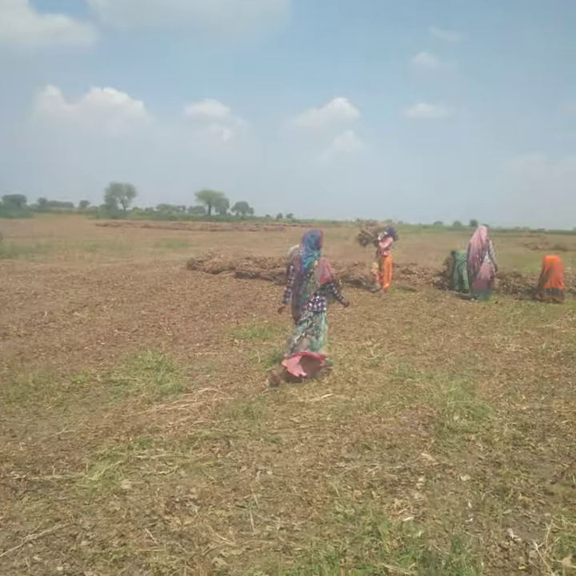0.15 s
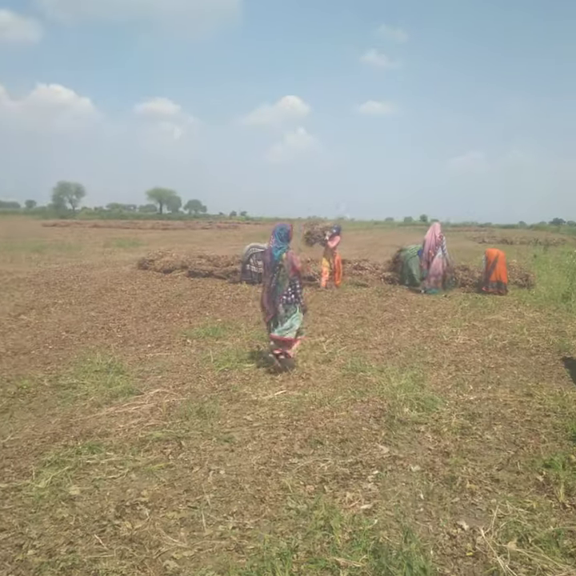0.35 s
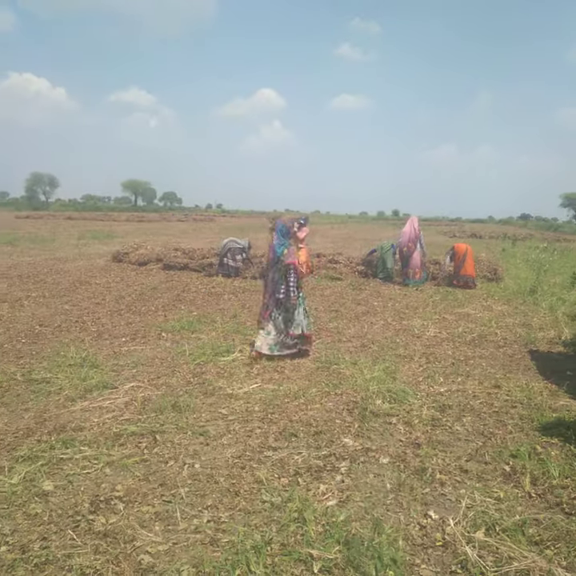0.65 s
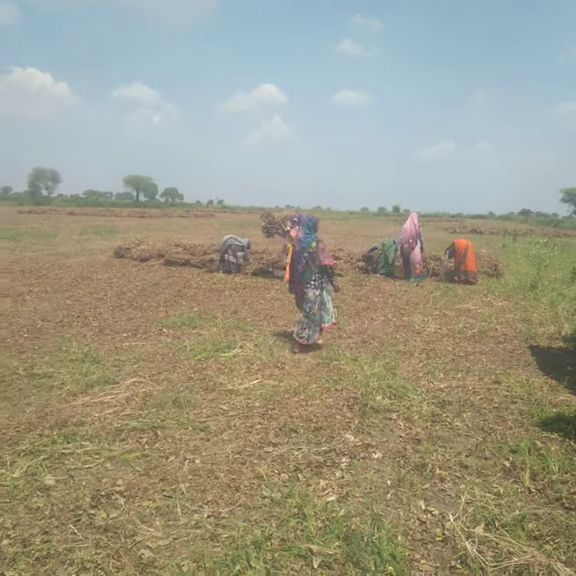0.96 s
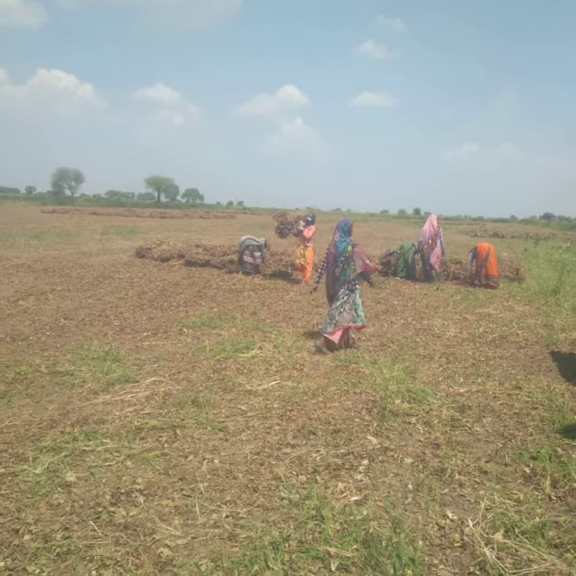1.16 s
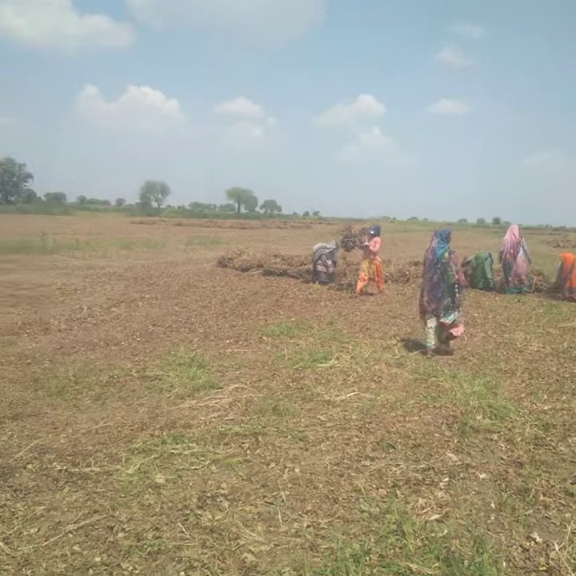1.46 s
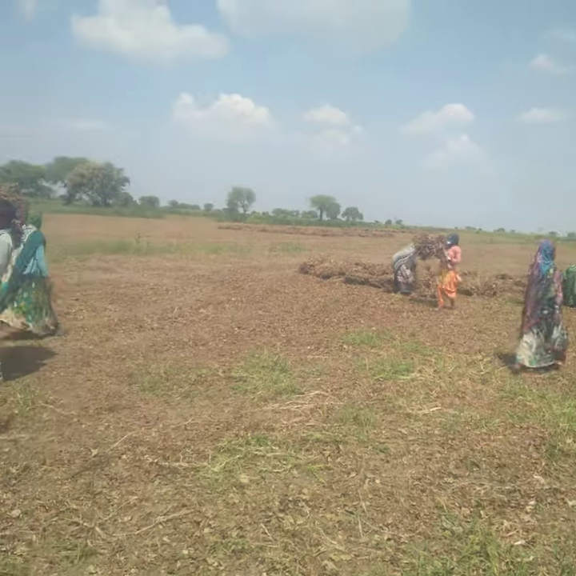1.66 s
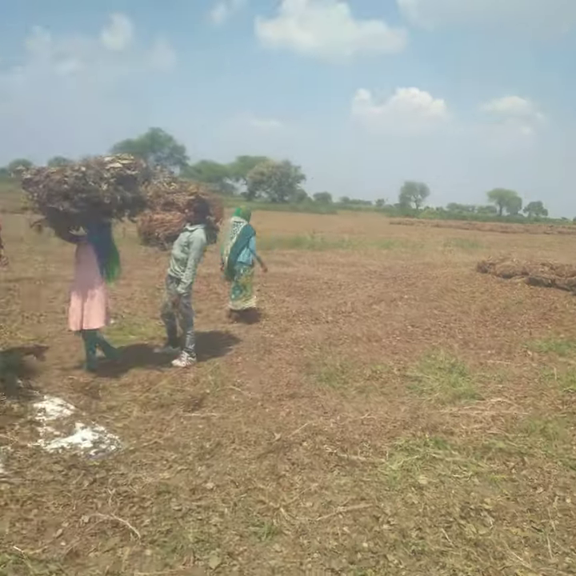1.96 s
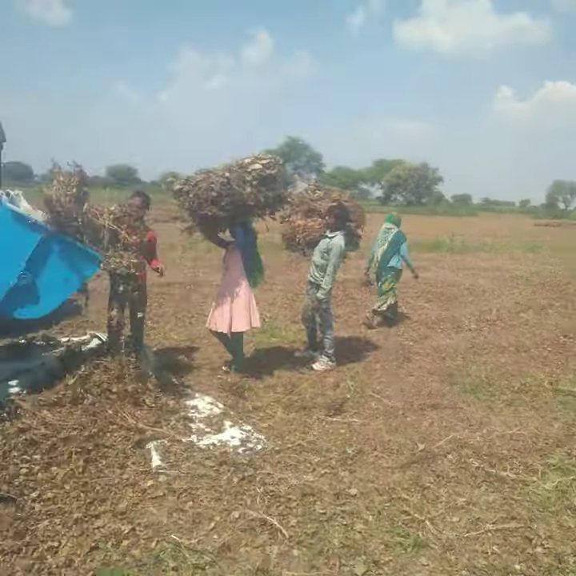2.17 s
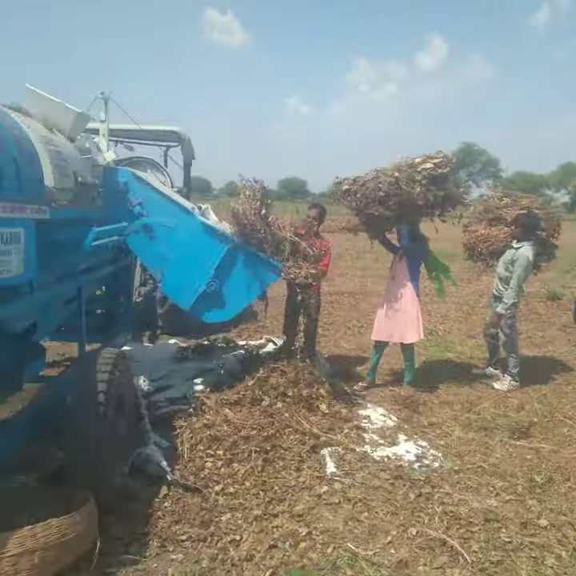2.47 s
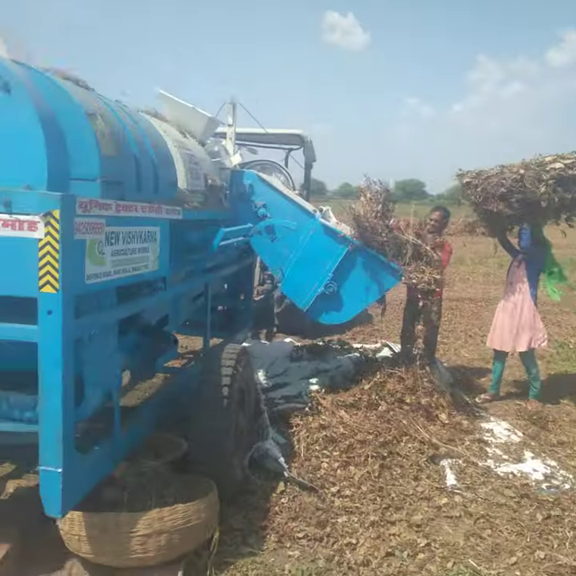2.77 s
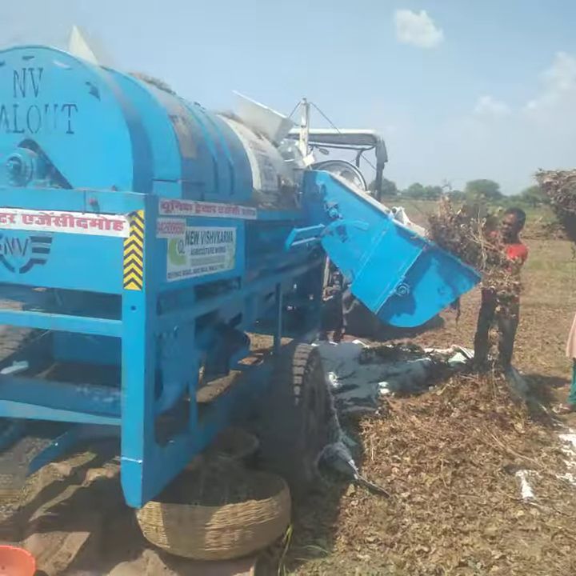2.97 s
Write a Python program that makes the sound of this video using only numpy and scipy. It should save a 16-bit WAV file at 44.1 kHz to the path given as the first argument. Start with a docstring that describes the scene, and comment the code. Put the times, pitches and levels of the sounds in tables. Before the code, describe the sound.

Close to the microphone outdoors, a thresher and its engine make a steady, throbbing roar with a rhythmic hiss of shaken chaff. Faint metal squeaks come now and then, and the tone shifts slightly near the end.

```python
"""Open field, a phone's stereo microphones close to a threshing machine driven by a tractor engine.
From the start, side-on: blower blades throb over the engine's drone, air and chaff rush through the
sheet-metal housing and the sieve shakes out a puff of hiss at each stroke. Rubbing metal squeaks now
and then, most often around 2 s. From 2.1 s the phone turns to face the machine and the tone shifts."""
import sys
import numpy as np
from scipy import signal
from scipy.io import wavfile
from scipy.ndimage import uniform_filter1d

SR = 44100
rng = np.random.default_rng(int(sys.argv[2]) if len(sys.argv) > 2 else 0)


def to_wav(sig):
    """Store sig (one row per channel, or 1-D mono) as 16-bit WAV at the path in sys.argv[1].

    Samples outside -1..1 are clipped; the rate is SR.
    """
    pcm = np.clip(np.atleast_2d(sig), -1, 1) * 32767
    pcm = np.round(pcm).astype(np.int16)
    wavfile.write(sys.argv[1], SR, pcm.T)  # frames by channels


N = 137151

# blower speed: (time [s], blade passes [1/s])
BLADE_RATE = [(0, 44.1), (.5, 44.0), (1.1, 43.93), (1.4, 44.05), (2.0, 44.1), (2.3, 44.25), (3.11, 44.42)]
# tones at the left microphone: (multiple of the rate, side-on rms level [dB], change when facing [dB])
BLADE_TONES = [(1, -16, 0.1), (2, -15.5, 1.5), (3, -32, 3.5), (4, -29.5, 2.5), (5, -33.5, 4.5), (6, -33, 2),
               (7, -32.5, -0.5), (8, -44, -2), (9, -41.5, 0), (10, -37, -5), (11, -48.5, 3),
               (12, -45.5, -10), (13, -57, 15)]  # on the blade rate
ENGINE_TONES = [(1, -37.5, 1), (2, -28, -2), (3, -35, 0), (4, -33.5, 0), (5, -39, 0), (6, -43, 0)]  # on the crank rate
SHAFT_AND_HALF_ORDER = [(.787, -36, -4), (1.5, -39, 0)]  # on the blade rate
# colour of the rush at each microphone, before RUSH_TRIM_DB: (frequency [Hz], density [dB/Hz])
RUSH_LEFT_SIDE_ON = [(20, -58), (32, -45), (62, -46), (100, -40.5), (121, -51), (150, -49.5), (220, -48.5),
                     (290, -53), (360, -53), (500, -57.5), (700, -61), (1000, -56.5), (1400, -62),
                     (1900, -57.5), (2400, -63), (2850, -70), (3350, -60), (3900, -57), (4400, -57.5),
                     (4800, -60.5), (5400, -62.5), (6300, -67.5), (7200, -62), (7800, -69.5), (8600, -71.5),
                     (9300, -78), (10500, -87), (12500, -85), (15500, -95)]
RUSH_LEFT_FACING = [(500, -68.5), (700, -56), (1000, -59), (1400, -62.5), (1900, -59), (2400, -59.6),
                    (2850, -61.5), (3350, -68), (3900, -63.5), (4400, -61), (4800, -61.5), (5400, -63),
                    (6300, -63.5), (7200, -65), (7800, -74), (8600, -71), (9300, -82), (10500, -83),
                    (12500, -89), (15500, -93)]
RUSH_RIGHT = [(500, -59.5), (700, -61), (1000, -61), (1400, -66), (1900, -63), (2850, -66.5), (3900, -65),
              (6300, -69), (7200, -73), (7800, -65.5), (8600, -67.5), (9300, -70), (10500, -79),
              (12500, -89), (15500, -91)]
# how alike the rush is at the two microphones: (frequency [Hz], coherence [0-1])
COHERENCE = [(60, .998), (130, .985), (300, .975), (600, .91), (900, .83), (1200, .7), (1500, .42),
             (2300, .15), (4000, .05), (15000, 0)]
# the phone's turn from side-on to facing the machine: (time [s], turn [0-1])
PHONE_TURN = [(0, 0), (2.1, 0), (2.45, 0.6), (2.6, 0.78), (3.11, 0.98)]
# swells of the rush about MID_REST_DB and TREBLE_REST_DB: (time [s], mids [dB], treble [dB])
RUSH_SWELLS = [(0.0, -31, -34), (0.02, -28.5, -32.5), (0.42, -28, -34), (0.52, -28.5, -33),
               (1.14, -28, -33.5), (1.21, -29, -30.5), (1.28, -28, -34), (1.93, -27.5, -32),
               (2.18, -27.5, -32), (2.91, -28, -31.5), (3.05, -27, -31.5), (3.11, -27.5, -34.5)]
# sieve strokes: (time [s], treble rise [dB])
SIEVE_STROKES = [(.08, 0), (.31, 4), (.54, 2), (.76, 1.5), (.98, 2), (1.21, 0.5), (1.44, 3), (1.66, 2),
                 (1.89, 2.5), (2.12, 0), (2.35, 3), (2.58, 3), (2.8, 3), (3.03, 3.5)]
# squeaks at the left microphone: (time [s], level [dB], pitch [Hz], length [s])
METAL_SQUEAKS = [(.31, -33, 3950, .04), (.75, -34, 4050, .03), (1.425, -32, 4050, .03),
                 (1.835, -33, 4300, .03), (1.92, -33, 3870, .08), (1.975, -30, 3880, .03),
                 (2.0, -29, 4000, .035), (2.02, -33, 4400, .035), (2.04, -34, 4000, .05),
                 (2.45, -29.5, 3950, .04)]

BLADE_WAVER_DB, ENGINE_WAVER_DB, WAVER_RAD = .2, .4, .045  # per multiple
CRANK_PER_PASS = .6239  # crank turns per blade pass
HUM_RIGHT_DB, HUM_LAG_RAD = -1, .13
RUSH_TRIM_DB, MID_REST_DB, TREBLE_REST_DB = -.5, -29, -33
PATCH_DB, FLICKER_DB = .7, .8
LAG_SIDE_ON_S, LAG_FACING_S, LAG_UP_TO_HZ = 170e-6, 90e-6, 1700  # the rush reaches the right mic later
SHARED_BELOW_HZ = 350  # the bass has one colour at both microphones
CHAFF_PER_S, CHAFF_SHARE, CHAFF_SPREAD_DB = 2500, .13, 3.5
PINGS_PER_S, PING_T60_S, PING_SHARE = 900, .06, .08
STROKE_S, PUFF_S, BACKSTROKE_SHARE, PUFF_FROM_HZ = .227, .014, .5, 3000
SQUEAK_WIDTH_HZ, SQUEAK_RIGHT_DB, SQUEAK_FUZZ = 40, -8, .35


def blower(passes):
    """Each passing blade pushes out a pulse; harmonics above the fifth fall out of step with it."""
    lead_rad = lambda k: 1.25 * (k == 1) + 2 * np.pi * rng.random() * (k > 5)
    return tones(passes - .06, BLADE_TONES, lead_rad, BLADE_WAVER_DB)


def engine(passes):
    """Firings of the engine belted to the blower, suction first."""
    return tones(CRANK_PER_PASS * passes + .195, ENGINE_TONES, lambda k: np.pi, ENGINE_WAVER_DB)


def shaft_and_half_order(passes):
    """One shaft's low hum and the blower's half-order tone."""
    return tones(passes, SHAFT_AND_HALF_ORDER, lambda k: 0, ENGINE_WAVER_DB)


def rush():
    """Air and chaff hiss through the housing, swelling, flickering and puffing with the sieve."""
    ticks = np.sqrt(CHAFF_SHARE) * chaff()
    air = np.sqrt(1 - CHAFF_SHARE) * rng.standard_normal((2, N))
    steady = rush_at_microphones(air + ticks + np.sqrt(PING_SHARE) * housing_pings())
    hz, t, spectrum = signal.stft(steady, SR, nperseg=512, noverlap=384)
    patches = rng.standard_normal((len(t), len(hz))).T
    patches = uniform_filter1d(patches, size=8, axis=0)
    patches = unit_spread(uniform_filter1d(patches, size=20, axis=1))
    flicker = unit_spread(uniform_filter1d(rng.standard_normal(len(t)), size=12))
    hz = hz[:, None]
    above_bass = np.clip(hz / 600, 0, 1)
    treble = np.clip((hz - 2500) / 3500, 0, 1)
    puff_band = hz ** 2 / (hz ** 2 + PUFF_FROM_HZ ** 2)
    gain_db = above_bass * (1 - treble) * (curve(RUSH_SWELLS, t) - MID_REST_DB)
    gain_db += treble * (curve(RUSH_SWELLS, t, column=2) - TREBLE_REST_DB)
    gain_db += above_bass * PATCH_DB * patches
    gain_db += puff_band * (sieve_db(t) + FLICKER_DB * flicker)
    return signal.istft(spectrum * amp(gain_db), SR, nperseg=512, noverlap=384)[1][:, :N]


def chaff():
    """Flying chaff makes dense ticks of uneven strength."""
    ticks = (rng.random((2, N)) < CHAFF_PER_S / SR) * rng.choice([-1., 1.], (2, N))
    strength_db = CHAFF_SPREAD_DB * np.minimum(rng.exponential(1, (2, N)), 5)
    return unit_spread(ticks * amp(strength_db))


def housing_pings(count=60, low_hz=700, high_hz=13000):
    """Stalks strike the housing, each briefly ringing one patch of sheet metal."""
    t, out = np.arange(4096) / SR, np.zeros((2, N))
    for hz in np.linspace(low_hz, high_hz, count) * rng.uniform(.97, 1.03, count):
        blows = (rng.random((2, N)) < PINGS_PER_S / count / SR) * rng.random((2, N))
        ring = amp(-60 * t / PING_T60_S) * np.sin(2 * np.pi * hz * t) * np.minimum(t / .002, 1)
        for side, at in zip(*np.nonzero(blows)):
            part = out[side, at:at + len(t)]
            part += blows[side, at] * ring[:len(part)]
    return unit_spread(out)


def sieve_db(t):
    """The hiss rises at each sieve stroke, and less on the way back."""
    puff = lambda at: np.exp(-.5 * ((t - at) / PUFF_S) ** 2)
    return sum(db * (puff(at) + BACKSTROKE_SHARE * puff(at + STROKE_S / 2)) for at, db in SIEVE_STROKES)


def squeaks():
    """Rubbing metal gives short fuzzy whistles, mostly on the left."""
    t, out = np.arange(4410) / SR, np.zeros(N)
    pole = np.exp(-np.pi * SQUEAK_WIDTH_HZ / SR)
    for start, db, hz, length in METAL_SQUEAKS:
        noise = rng.standard_normal(len(t))
        fuzz = SQUEAK_FUZZ * unit_spread(signal.lfilter([1 - pole], [1, -pole], noise))
        arch = np.sin(np.pi * np.clip(t / length, 0, 1))
        whistle = np.sqrt(2) * (1 + fuzz) * np.sin(2 * np.pi * hz * t + fuzz)
        out[round(start * SR):][:len(t)] += amp(db) * arch * whistle
    return out * amp([[0], [SQUEAK_RIGHT_DB]])


def tones(cycles, table, lead_rad, waver_db):
    """Wavering multiples of one rotation, a little later and softer at the right microphone."""
    t, left = np.arange(N) / SR, np.zeros(N, complex)
    coarse_t = t[::200]
    turn = curve(PHONE_TURN, coarse_t)
    for k, db, facing_db in table:
        level = amp(db + facing_db * turn + waver_db * k * drift(coarse_t, top_hz=12))
        wobble = np.exp(1j * WAVER_RAD * k * drift(coarse_t, top_hz=7.3))
        phase = 2 * np.pi * k * cycles + lead_rad(k)
        left += np.interp(t, coarse_t, level * wobble) * np.exp(1j * phase)
    right = amp(HUM_RIGHT_DB) * left * np.exp(-1j * HUM_LAG_RAD)
    return np.sqrt(2) * np.array([left.real, right.real])


def rush_at_microphones(noise):
    """Colours the rush per microphone; the left colour and the right lag follow the phone's turn."""
    hz, t, (left, independent) = signal.stft(noise, SR, nperseg=4096, noverlap=3584)
    turn = curve(PHONE_TURN, t)
    hz = hz[:, None]
    lag_s = LAG_SIDE_ON_S + (LAG_FACING_S - LAG_SIDE_ON_S) * turn
    delay = np.exp(-2j * np.pi * hz * lag_s / (1 + (hz / LAG_UP_TO_HZ) ** 4))
    alike = at_hz(COHERENCE, hz)
    right = alike * delay * left + np.sqrt(1 - alike ** 2) * independent
    apart = np.clip(2 * (hz / SHARED_BELOW_HZ - 1), 0, 1)
    side_on_db = at_hz(RUSH_LEFT_SIDE_ON, hz)
    left_db = side_on_db + turn * apart * (at_hz(RUSH_LEFT_FACING, hz) - side_on_db)
    right_db = (1 - apart) * (side_on_db + HUM_RIGHT_DB) + apart * at_hz(RUSH_RIGHT, hz)
    pair = np.array([left * amp(left_db), right * amp(right_db)]) * amp(RUSH_TRIM_DB) * np.sqrt(SR / 2)
    return signal.istft(pair, SR, nperseg=4096, noverlap=3584)[1]


def drift(t, top_hz):
    """Slow random wander of unit spread."""
    rates = np.geomspace(.3, top_hz, num=12)
    return unit_spread(sum(np.sin(2 * np.pi * (hz * t + rng.random())) / np.sqrt(hz) for hz in rates))


def amp(db):
    return 10 ** (np.asarray(db) / 20)


def unit_spread(x):
    return (x - x.mean()) / x.std()


def at_hz(table, hz):
    """Reads a table on a log-frequency axis."""
    table_hz, values = np.transpose(table)
    return np.interp(np.log(hz + 1), np.log(table_hz + 1), values)


def curve(table, t, column=1):
    rows = np.array(table, float)
    return np.interp(t, rows[:, 0], rows[:, column])


def scene():
    """The thresher from close by; all its hums follow the blower's speed."""
    passes = np.cumsum(curve(BLADE_RATE, np.arange(N) / SR)) / SR
    return blower(passes) + engine(passes) + shaft_and_half_order(passes) + rush() + squeaks()


def record(dry, ceiling=1.15, edge_hz=15900):
    """The loudest peaks are softly rounded off, then the top of the treble is cut."""
    soft = dry / (1 + abs(dry / ceiling) ** 4) ** .25
    lowpass = signal.firwin(1023, edge_hz, window=("kaiser", 10), fs=SR)
    return signal.oaconvolve(soft, lowpass[None], "same")


dry = scene()
out = record(dry)
to_wav(out)
```